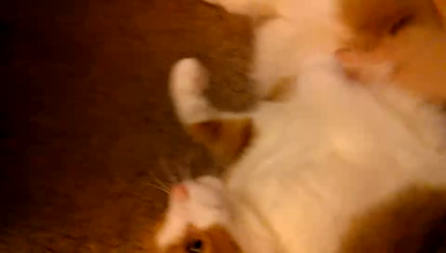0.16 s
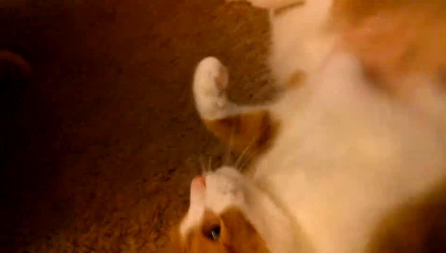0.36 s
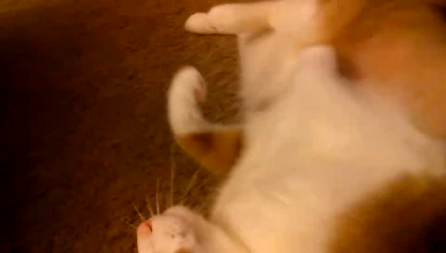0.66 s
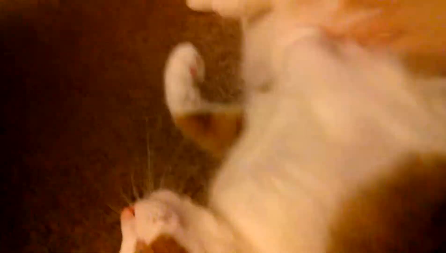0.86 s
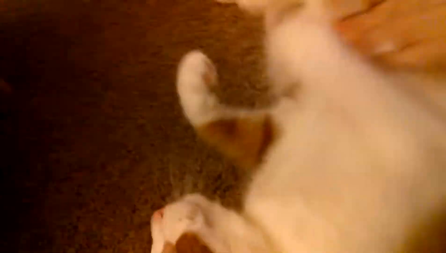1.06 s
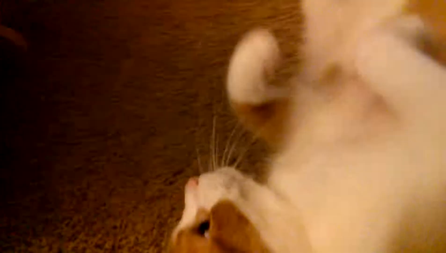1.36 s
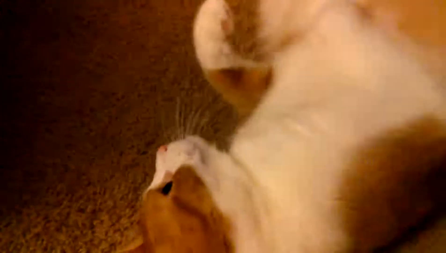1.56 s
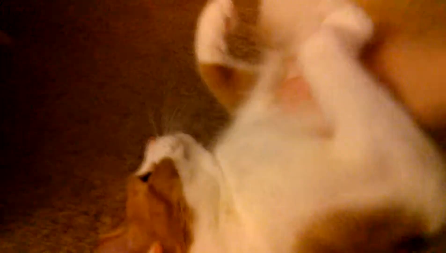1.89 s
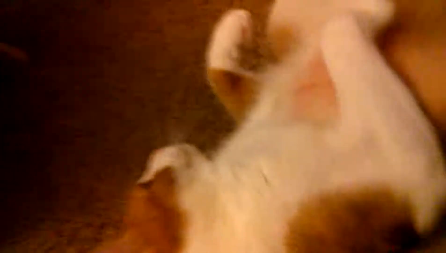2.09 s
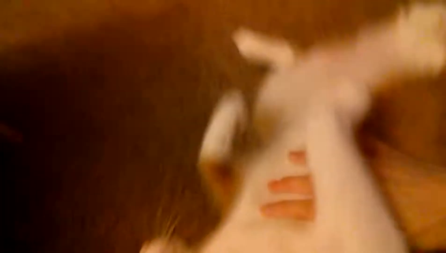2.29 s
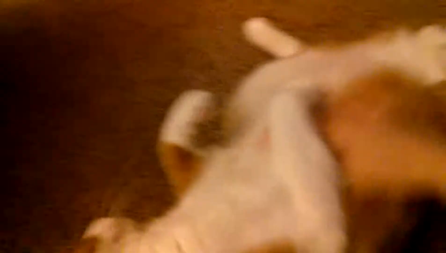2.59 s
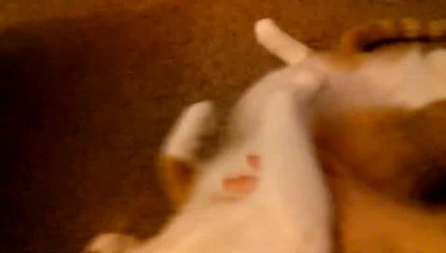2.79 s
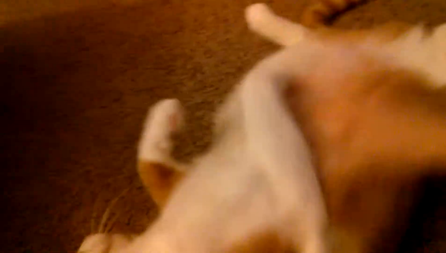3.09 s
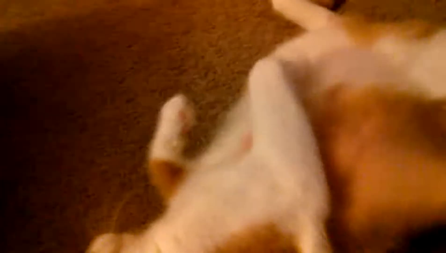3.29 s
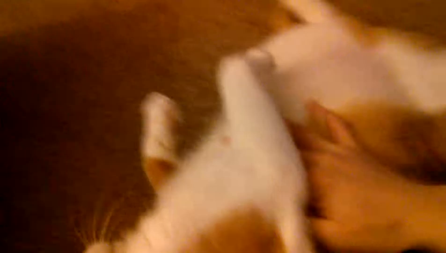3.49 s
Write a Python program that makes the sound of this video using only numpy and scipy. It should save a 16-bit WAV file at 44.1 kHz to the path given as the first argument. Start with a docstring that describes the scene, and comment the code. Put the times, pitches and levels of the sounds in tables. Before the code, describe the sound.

A cat's low purr flutters about 27 times a second, surging early and fainter after 1.7 s. A hand rubs its fur some eight or nine strokes a second, airy and grainy. A rougher brush lasts until 0.85 s. Scrapes and soft bumps cluster before 1.9 s, a sharp click at 0.91; few return near 3.3 s. Microphone rumble lurches, strongest around 1.2 s, over faint room hiss.

```python
"""A cat lies on a carpet and purrs low: uneven puffs of noise rumble through its throat and chest.
A hand rubs its fur back and forth, about eight strokes a second, each a swell of grainy noise.
A longer, rougher brush opens the scene; damped rings make soft bumps, runs of ticks make short scrapes,
and single impulses make small clicks. Deep noise is the rumble of the hand-held microphone.
A faint hiss is the quiet room. The sound is almost mono."""
import sys
import numpy as np
from scipy import signal
from scipy.fft import rfft, irfft
from scipy.io import wavfile
from scipy.ndimage import uniform_filter1d

SR = 44100
rng = np.random.default_rng(int(sys.argv[2]) if len(sys.argv) > 2 else 0)


def file_out(sig):
    """Save sig as 16-bit WAV at sys.argv[1]."""
    # one column per channel
    cols = np.atleast_2d(sig).T
    # limit, then scale
    lim = np.clip(cols, -1, 1)
    pcm = np.round(lim * 32767).astype(np.int16)
    wavfile.write(sys.argv[1], SR, pcm)


N = 160965  # length of the scene in samples

# Every spectrum below gives only the tone colour; its loudness is set elsewhere.

# Strength of the purr over time. Each row: time in seconds, level in dB.
PURR_LEVEL = [(0, -52), (.2, -46.5), (.37, -51), (.5, -43.5), (.62, -51), (.72, -49), (.95, -46),
              (1.07, -51.5), (1.4, -45.5), (1.6, -50), (1.75, -53), (1.95, -50), (2.4, -52.5), (2.7, -50.5),
              (2.92, -52), (3.05, -48.5), (3.27, -52.5), (3.42, -49), (3.65, -55)]
# Spectrum of the cat's throat. Each row: frequency in Hz, relative level in dB per Hz.
THROAT_SPECTRUM = [(30, -4.5), (70, -1.5), (95, -9.5), (120, 4), (145, -6.5), (172, 1.5), (200, -9),
                   (238, -5), (290, -14), (340, -14.5), (420, -20), (530, -20.5), (700, -31), (2000, -64)]
PURR_HZ, PURR_JITTER = 26.73, 0.1  # puffs per second (about), uneven spacing as a fraction
PURR_SCATTER_DB = 3  # random spread of puff strength
PUFF_S, PUFF_HOLD = 0.014, 0.79  # fade time of a puff, steady flow beneath the puffs
PURR_SWELL_HZ, PURR_SWELL_DB = 7.1, 1.9  # speed and depth of the surges

# Strokes of the hand, to and fro.
# Each row: middle in seconds, level of the fur's hiss in dB, level of the duller skin friction in dB.
STROKES = [(.01, -63, -63.5), (.08, -66, -68), (.205, -60.5, -57), (.335, -72, -60.5), (0.46, -58, -59),
           (.53, -67, -71), (0.575, -59.5, -57.5), (.695, -58, -63), (.79, -63, -62), (0.904, -55.5, -63),
           (1.012, -61.5, -65), (1.124, -54.5, -61), (1.236, -62, -64.5), (1.355, -57.5, -65.5),
           (1.464, -62, -65.5), (1.58, -56.5, -63), (1.695, -65, -71.5), (1.813, -61, -72.5),
           (1.909, -64.5, -67.5), (2.024, -61.5, -72), (2.132, -62, -67.5), (2.256, -59.5, -71),
           (2.368, -61.5, -68), (2.487, -58.5, -68.5), (2.608, -63, -69), (2.729, -57.5, -68.5),
           (2.851, -60, -66.5), (2.98, -57, -69.5), (3.087, -60, -67.5), (3.217, -55.5, -68),
           (3.322, -57, -71), (3.447, -57, -76), (3.558, -59.5, -66.5)]
# Spectrum of the fur's hiss. Each row: frequency in Hz, relative level in dB per Hz.
FUR_SPECTRUM = [(1500, -53), (3500, -13), (5500, -9), (8000, -0.5), (11000, -4.5), (15500, -10)]
# Spectrum of the skin friction. Each row: frequency in Hz, relative level in dB per Hz.
SKIN_SPECTRUM = [(150, -33), (400, -6.5), (1000, 7.5), (2000, 7), (3800, 6), (6000, 2.5), (9000, -24),
                 (15000, -18)]
STROKE_RISE_S, STROKE_FALL_S = 0.036, 0.043
FUR_GRAIN = 0.31  # how unevenly loud the single hairs are
SNAG_HZ, SNAG_DB = 29.2, 2  # speed and depth of the snagging

# Spectrum of the brush. Each row: frequency in Hz, relative level in dB per Hz.
BRUSH_SPECTRUM = [(100, -11), (300, 4.5), (650, 4.5), (1130, 1), (2200, -3), (3800, -1), (6000, -1.5),
                  (8500, -15), (15000, -42)]
BRUSH_START_S, BRUSH_END_S = -0.3, 0.855  # it is already under way when the scene begins
BRUSH_ATTACK_S, BRUSH_RELEASE_S, BRUSH_DB = 0.47, 0.06, -58
BRUSH_WAVER_HZ, BRUSH_WAVER_DB = 12.7, 1.6

# Short rough scrapes of fingers or claws. Each row: middle in seconds, half length in seconds, level in dB.
SCRAPES = [(0.274, 0.027, -53.5), (0.407, 0.016, -53.5), (0.453, 0.012, -48.5), (0.481, 0.013, -55),
           (0.816, 0.011, -63.5), (1.03, 0.01, -62.5), (1.24, 0.036, -60), (1.341, 0.024, -55),
           (1.467, 0.0078, -55), (1.691, 0.013, -59.5), (1.806, 0.034, -61), (2.005, 0.0081, -59.5),
           (2.239, 0.014, -59), (3.048, 0.027, -64.5), (3.336, 0.029, -64.5), (3.435, 0.046, -67.5)]
# Spectrum of a scrape, with its hollow resonance. Each row: frequency in Hz, relative level in dB per Hz.
SCRAPE_SPECTRUM = [(100, -25), (300, 6.5), (440, 4.5), (530, 6), (640, -11.5), (1100, -4.5), (1800, -9),
                   (3000, -13), (5000, -15), (12000, -33)]
SCRAPE_TICKS_PER_S, SCRAPE_SCATTER_DB = 830, -1  # the scatter is random, so its sign does not matter

# Soft bumps of paw, hand and microphone.
# Each row: start in seconds, peak of the ring in dB, pitch in Hz, rise in seconds, decay in seconds,
# share of scuff from 0 to 1.
BUMPS = [(0.268, -43.5, 310, 0.00075, 0.012, 0.5), (.27, -39, 164, 0.0023, 0.025, .15),
         (0.409, -33.5, 290, 0.00061, 0.0024, 0), (.414, -44, 292, 0.0012, 0.0091, 0.45),
         (0.443, -42, 178, 0.0022, .016, .1), (.466, -33, 296, 0.0021, 0.0033, 0.07),
         (0.477, -38, 210, 0.00083, .009, 0.4), (0.52, -43, 119, .003, .018, 0),
         (.776, -37, 159, .001, 0.0094, 0.1), (.815, -55, 376, .002, 0.0072, 0.7),
         (.878, -47, 175, 0.0024, 0.015, 0.4), (.975, -40.5, 150, 0.0039, .022, 0),
         (1.032, -47, 460, .0018, 0.0033, 0.4), (1.119, -39, 200, .001, 0.005, 0.05),
         (1.1259, -36.5, 291, .001, 0.007, 0.02), (1.239, -39.5, 198, .001, 0.0054, 0.35),
         (1.248, -50.5, 474, .003, .008, 0.58), (1.329, -43.5, 320, .0016, 0.0038, 0.26),
         (1.344, -39.5, 283, 0.0041, 0.0055, 0), (1.461, -35, 354, .001, 0.0032, .15),
         (1.472, -48, 493, .002, 0.0049, 0.37), (1.554, -50, 149, 0.0058, 0.027, 0.45),
         (1.6395, -31.5, 164, 0.00075, .008, 0.08), (1.688, -45.5, 406, 0.0017, 0.0048, 0.3),
         (1.695, -44.5, 480, 0.0015, 0.0033, 0.2), (1.788, -52, 222.6, 0.0018, 0.021, 0.5),
         (1.875, -42, 133, 0.002, 0.0063, 0.64), (2.239, -50.5, 164, 0.0027, 0.019, .3),
         (3.291, -34.5, 155, .002, 0.0036, 0.07), (3.3062, -39, 265, 0.0011, 0.0053, 0.08),
         (3.307, -46, 536, 0.0013, 0.018, 0.21), (3.435, -45.5, 249, 0.0055, 0.013, 0.47),
         (3.52, -40.5, 155.3, 0.0031, 0.021, 0.12)]
SCUFF_WIDTH_RATIO, SCUFF_CENTRE_RATIO = 1, 0.77  # both as multiples of the bump's pitch

# Small clicks. Each row: start in seconds, peak in dB, centre in Hz, bandwidth in Hz.
CLICKS = [(.445, -54, 1160, 250), (.4655, -34, 880, 600), (.466, -39, 8500, 7000), (0.477, -46, 1130, 350),
          (.494, -45, 950, 600), (.9135, -23, 11000, 5540), (.9137, -39.5, 5840, 900),
          (1.1247, -33.5, 980, 960), (1.1249, -37.5, 2820, 1900), (1.4995, -40, 7950, 3000),
          (2.008, -47.5, 900, 706), (2.009, -55, 1900, 1200), (3.2, -51.5, 800, 300),
          (3.307, -53, 900, 700)]

# Lurches of the hand that holds the microphone.
# Each row: middle in seconds, half length in seconds, level in dB.
LURCHES = [(0.293, 0.027, -47), (0.508, 0.034, -42), (0.732, 0.039, -39), (0.958, 0.043, -36),
           (1.167, 0.044, -33), (1.256, 0.019, -40.5), (1.387, 0.064, -39), (1.47, 0.031, -49),
           (1.625, 0.037, -38), (1.885, 0.073, -42), (2.06, 0.058, -41.5), (2.28, 0.036, -38),
           (2.51, 0.078, -49.5), (2.59, 0.015, -42), (2.825, 0.025, -44), (3.023, 0.034, -40),
           (3.254, 0.03, -40)]
# Spectrum of the handling rumble. Each row: frequency in Hz, relative level in dB per Hz.
RUMBLE_SPECTRUM = [(6, 1), (14, -7.5), (22, -0.5), (35, -8), (55, -14.5), (85, -11), (130, -30.5),
                   (300, -62), (1000, -99)]
HANDLING_DB = -48  # the rumble between lurches

# Spectrum of the quiet room. Each row: frequency in Hz, relative level in dB per Hz.
ROOM_SPECTRUM = [(30, 28), (120, 27), (300, 26), (530, 7.5), (700, 13), (1100, 9), (2000, 1), (4500, -5.5),
                 (8000, 3.5), (15500, 6)]
ROOM_DB = -58.5

# Spectrum of a faint noise that differs between left and right.
# Each row: frequency in Hz, relative level in dB per Hz.
SIDE_SPECTRUM = [(100, -18), (300, 0), (600, -4.5), (1100, 8.5), (2500, 19), (4500, 22.5), (8000, -5),
                 (12000, -2.5), (15000, 12)]
SIDE_DB = -23  # level compared with the rustle
TOP_HZ = 15800  # highest frequency the recorder passes


def purr(t):
    """The larynx flutters unevenly and surges; each opening lets a puff of air rumble through throat and chest."""
    chance = rng.standard_normal(size=(200, 2))
    opens = np.cumsum(np.exp(PURR_JITTER * chance[:, 0])) / PURR_HZ
    opens -= opens[0]
    # Find the latest opening before each moment.
    cycle = np.searchsorted(opens, t, side="right") - 1
    strength = undb(PURR_SCATTER_DB * chance[cycle, 1])
    puffs = np.exp(-(t - opens[cycle]) / PUFF_S) * strength
    surge = undb(PURR_SWELL_DB * waver(PURR_SWELL_HZ))
    breath = (puffs + PUFF_HOLD) * surge * rng.standard_normal(N)
    return colour(breath, THROAT_SPECTRUM) * curve(PURR_LEVEL, t)


def rubbing(t):
    """Each stroke swells and fades with the hand's speed and snags a little; single hairs make the hiss grainy."""
    fur, skin = np.zeros(N), np.zeros(N)
    for middle, fur_db, skin_db in STROKES:
        length = np.where(t < middle, STROKE_RISE_S, STROKE_FALL_S)
        speed = np.exp(-((t - middle) / length) ** 2)
        fur += undb(fur_db) * speed
        skin += undb(skin_db) * speed
    hairs = rng.standard_normal(N) * np.exp(FUR_GRAIN * rng.standard_normal(N))
    snags = undb(SNAG_DB * waver(SNAG_HZ))
    return (fur * colour(hairs, FUR_SPECTRUM) + skin * noise(SKIN_SPECTRUM)) * snags


def brush(t):
    """One long, slightly uneven slide over the coat that builds, holds and stops."""
    build = np.clip((t - BRUSH_START_S) / BRUSH_ATTACK_S, 0, 1)
    stop = np.clip((BRUSH_END_S - t) / BRUSH_RELEASE_S, 0, 1)
    level = undb(BRUSH_DB + BRUSH_WAVER_DB * waver(BRUSH_WAVER_HZ))
    return level * build * stop * noise(BRUSH_SPECTRUM)


def scrapes(t):
    """Fibres catch and slip in quick runs of tiny ticks with a hollow colour."""
    ticks = rng.random(N) < SCRAPE_TICKS_PER_S / SR
    direction = np.sign(rng.standard_normal(N))
    slips = ticks * direction * undb(SCRAPE_SCATTER_DB * rng.standard_normal(N))
    return swells(SCRAPES, t) * colour(slips, SCRAPE_SPECTRUM)


def bumps(t):
    """Padded contacts: a heavily damped ring with a short scuff around its pitch."""
    out = np.zeros(N)
    for start, db, hz, rise, decay, rough in BUMPS:
        age = np.maximum(t - start, 0)
        scuff = unit(band(rng.standard_normal(N), hz * SCUFF_CENTRE_RATIO, hz * SCUFF_WIDTH_RATIO))
        shape = (1 - np.exp(-age / rise)) * np.exp(-age / decay)
        ring = np.sin(2 * np.pi * hz * age)
        out += undb(db) * shape / shape.max() * (ring + rough * scuff)
    return out


def clicks():
    """Tiny dry snaps, each one impulse ringing in a band of frequencies."""
    out = np.zeros(N)
    for start, db, hz, width_hz in CLICKS:
        ring = band(signal.unit_impulse(SR // 20), hz, width_hz)
        at = int(start * SR)
        out[at:at + len(ring)] += undb(db) * ring / np.abs(ring).max()
    return out


def handling(t):
    """The hand shakes the microphone into a deep rumble that swells with each lurch."""
    shake = undb(HANDLING_DB) + swells(LURCHES, t)
    return shake * noise(RUMBLE_SPECTRUM)


def room():
    """The quiet room is a faint, steady noise."""
    return undb(ROOM_DB) * noise(ROOM_SPECTRUM)


def swells(rows, t):
    """Add up smooth bell-shaped swells, each with a middle, a half length and a level."""
    return sum(undb(db) * np.exp(-((t - middle) / half) ** 2) for middle, half, db in rows)


def waver(rate_hz):
    """A smooth random wobble at an rms (average strength) of one."""
    return noise([(rate_hz / 4, 0), (rate_hz, -4), (rate_hz * 3, -40), (rate_hz * 10, -100)])


def noise(points):
    """Coloured noise at an rms of one."""
    return colour(rng.standard_normal(N), points)


def colour(x, points):
    """Filter a sound by a curve of (Hz, dB) points and bring it to an rms of one."""
    hz, db = np.array(points).T
    f = np.maximum(np.arange(N // 2 + 1) * SR / N, 1)
    gain = undb(np.interp(np.log(f), np.log(hz), db))
    return unit(irfft(rfft(x) * gain, N))


def band(x, hz, width_hz):
    """Keep only a band of frequencies around a centre."""
    low = np.hypot(hz, width_hz / 2) - width_hz / 2
    top = min(low + width_hz, SR * 0.47)
    return signal.sosfilt(signal.butter(2, [low, top], "band", fs=SR, output="sos"), x)


def curve(rows, t):
    """Turn a table of times and dB levels into a gain at every moment."""
    return undb(np.interp(t, *np.array(rows).T))


def unit(x):
    """Scale to an rms of one."""
    return x / np.sqrt(np.mean(x ** 2))


def undb(db):
    """Turn decibels into a gain."""
    return 10 ** (np.asarray(db) / 20)


def scene():
    """All sources sit in the middle; a faint side noise, rising and falling with the rustle, differs left to right."""
    t = np.arange(N) / SR
    rustle = rubbing(t) + brush(t) + scrapes(t)
    mid = purr(t) + rustle + bumps(t) + clicks() + handling(t) + room()
    # The side noise follows the short-term loudness of the rustle.
    loudness = np.sqrt(np.abs(uniform_filter1d(rustle ** 2, size=1000)))
    side = undb(SIDE_DB) * loudness * noise(SIDE_SPECTRUM)
    return np.array([mid + side, mid - side])


def record(dry):
    """The recorder cuts the top with a steep low-pass filter."""
    return signal.sosfilt(signal.ellip(10, 0.2, 70, TOP_HZ, fs=SR, output="sos"), dry)


dry = scene()
out = record(dry)
file_out(out)
```